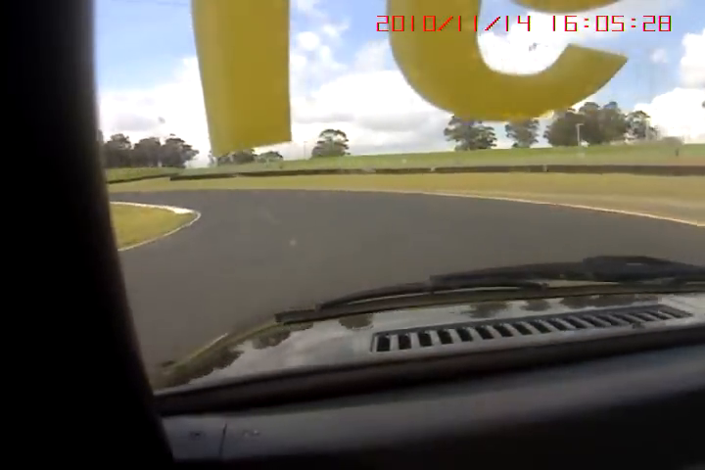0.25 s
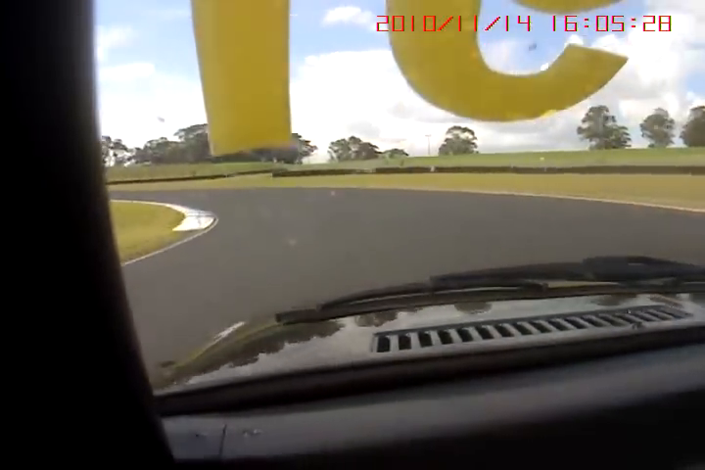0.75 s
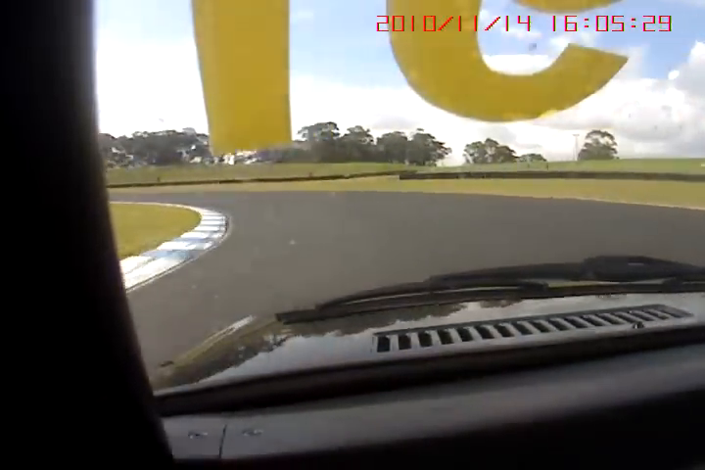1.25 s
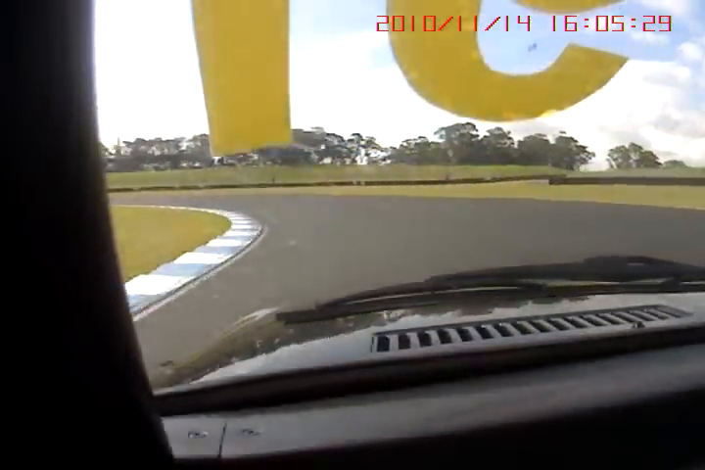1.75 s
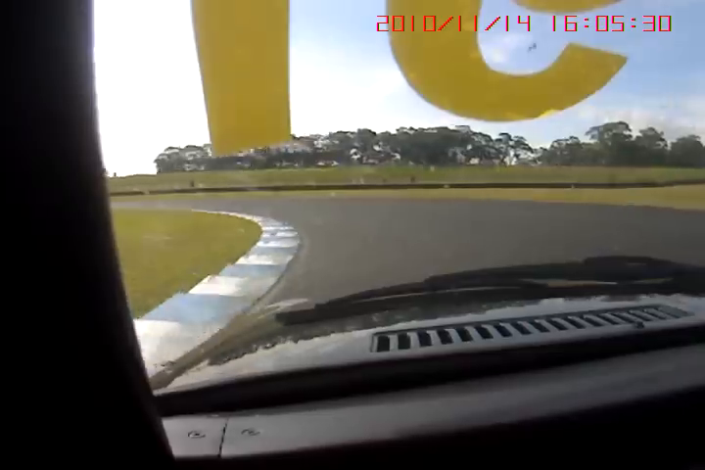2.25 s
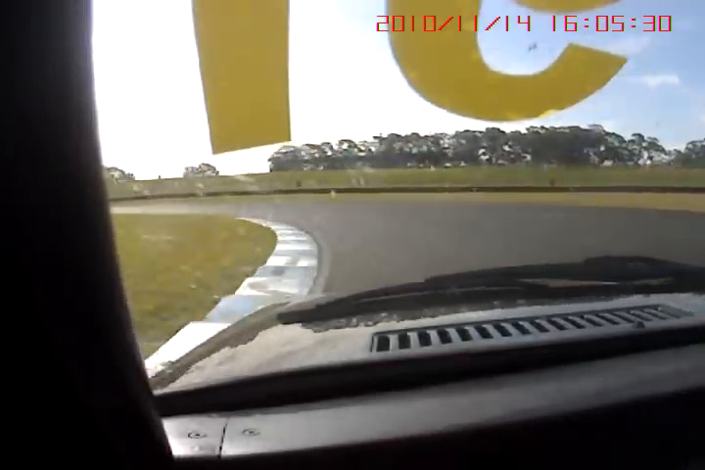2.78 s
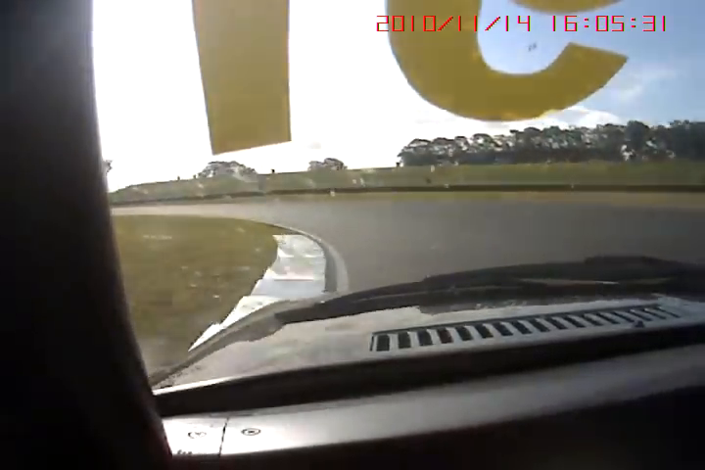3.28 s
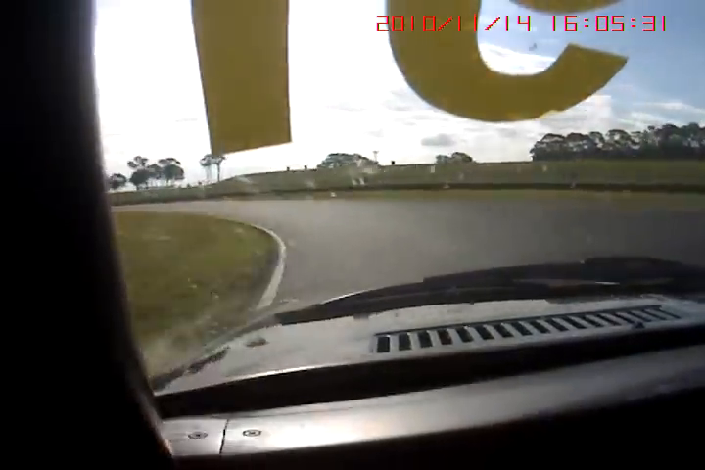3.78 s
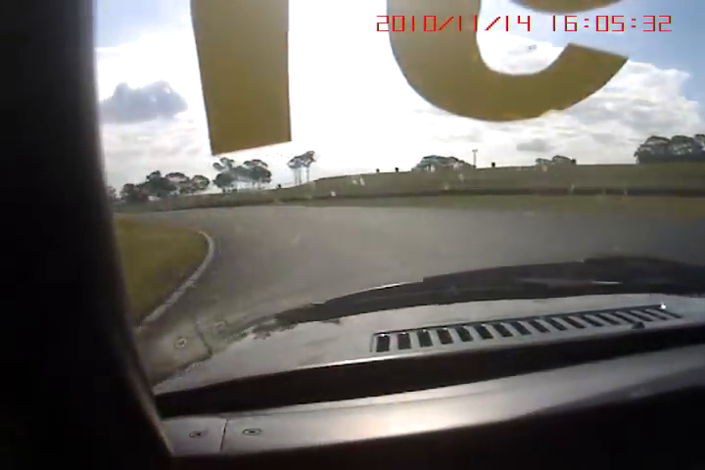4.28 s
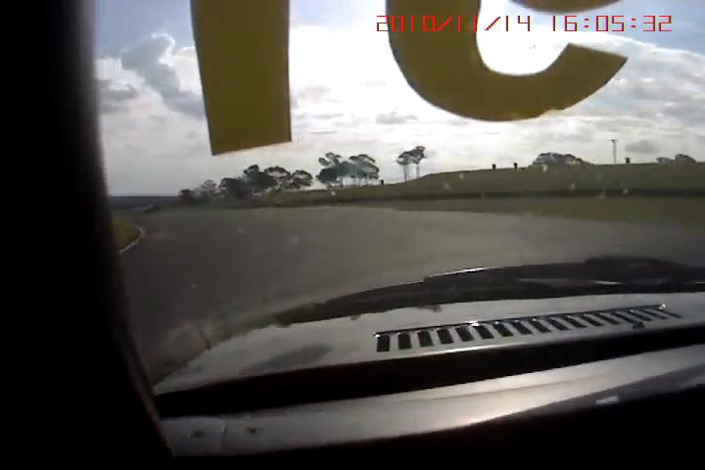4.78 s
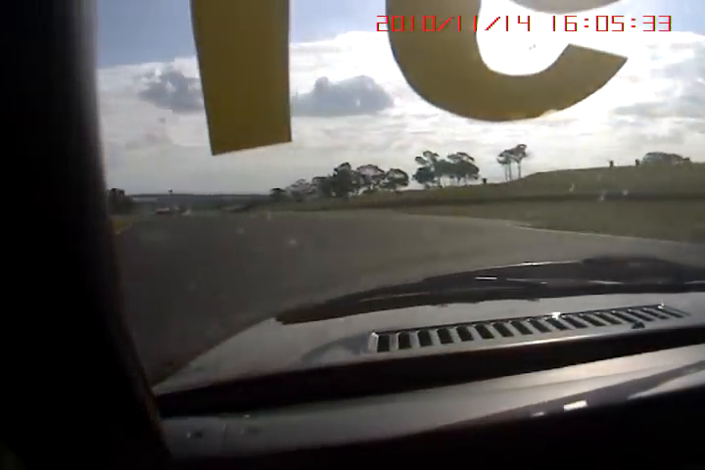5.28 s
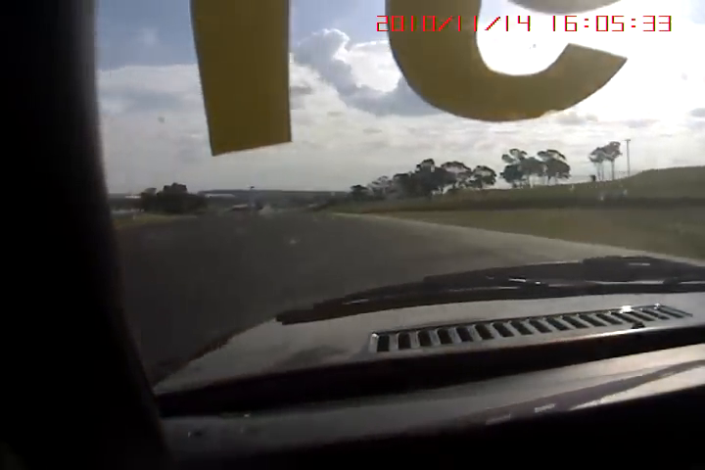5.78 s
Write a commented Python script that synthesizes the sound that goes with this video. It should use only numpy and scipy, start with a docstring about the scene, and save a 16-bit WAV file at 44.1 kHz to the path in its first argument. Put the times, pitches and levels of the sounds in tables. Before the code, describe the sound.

Heard inside a race car cabin through one close, mounted, single-channel microphone. From 0 to 1.5 s a six-cylinder engine drone eases down slightly in pitch, its firing tone near 260 Hz sagging to 230, with overtones swelling and fading in cabin resonances. Low road rumble, panel roar and scattered dry knocks of a loose mount accompany it. Around 1.5 to 3 s the throttle is light: the engine is softer, gear whine and a wavering mid-pitched tyre hum stand out. Around 3 to 3.4 s a few small stones tick underneath; rougher road rumbles until 3.9, with clustered knocks and a hard clack at 4.0. From about 4.2 s the engine pulls strongly, climbing smoothly to about 310 Hz by 6 s, louder and fuller, while buzzing, rattling knocks and slightly stronger air hiss crowd in. It ends still accelerating, without a shift.

```python
"""A six-cylinder engine, heard inside a race car in a bend, eases off and then pulls hard out of the corner.
Its sound is a stack of sine waves tied to the turning crank, swelling where the cabin resonates; gears whine along.
The tyres add a wavering hum, and shaped noise makes the road rumble, the roar of the body and the hiss of air.
A loose mount buzzes and knocks as the shaking throws it about, and a few small stones tick under the car."""
import sys
import numpy as np
from scipy import signal
from scipy.fft import rfft, irfft
from scipy.io import wavfile
from scipy.ndimage import uniform_filter1d

SR = 44100
rng = np.random.default_rng(int(sys.argv[2]) if len(sys.argv) > 2 else 0)


def master_out(mix):
    """Clip the mix to full scale and print it as 16-bit PCM to the path in sys.argv[1]."""
    frames = np.transpose(np.atleast_2d(mix))
    ceiling = np.clip(frames, -1, 1)
    pcm = np.round(ceiling * 32767).astype(np.int16)
    wavfile.write(sys.argv[1], SR, pcm)


N = 266364  # length in samples

# Engine speed and its main tone: time_s, cycle_rate_hz (four-stroke cycles), firing_level_db
ENGINE_SPEED = [(0, 43.22, -41), (.14, 42.2, -28), (.35, 41.36, -24.5), (.65, 40.63, -32.5),
                (.95, 39.62, -31.5), (1.1, 39.19, -17.5), (1.2, 38.83, -28), (1.28, 38.53, -25),
                (1.4, 38.48, -33), (1.53, 38.18, -32), (1.64, 38.36, -19.5), (1.95, 38.36, -33.5),
                (2.4, 38.81, -29), (2.7, 39.29, -22), (3.05, 40.4, -25), (3.5, 41.55, -50),
                (3.75, 42.17, -41), (3.92, 42.68, -26), (4.4, 43.83, -19), (4.8, 45.65, -13),
                (5.0, 46.7, -20.5), (5.15, 47.21, -11.5), (5.45, 48.99, -12.5), (5.8, 50.54, -10),
                (6.04, 51.56, -16.5)]
# How far the throttle is open: time_s, opening (0 shut, about 1 full)
THROTTLE_OPENING = [(0, 0.44), (.5, 0.24), (1, 0.38), (1.6, 0.21), (2.2, 0.04), (2.8, 0.26), (3.4, 0.42),
                    (4, 0.58), (4.6, 0.98), (5.2, 1.01), (6.04, 1.01)]
# How strongly the cabin passes orders 3, 9 and 12: pitch_hz, level_db (before waver and slowing)
CABIN_PASSES = [(114, -30), (120, -32.5), (125, -36), (129, -39), (154, -38), (343, -34), (365, -27),
                (376, -29), (392, -22.5), (425, -33), (440, -25), (455, -22.5), (457, -30.5), (471, -27.5),
                (480, -50), (488, -32.5), (497, -24), (508, -31.5), (518, -50.5), (545, -29.5), (565, -41),
                (590, -28.5), (616, -34.5)]
# How those three orders vary: order (multiple of the cycle), waver_db, change_while_slowing_db
ORDER_WAVER = [(3, 1.5, -0.5), (9, 2.6, -5.5), (12, 2, -12)]
# Weaker orders from uneven cylinders and pipe lengths: order, base_level_db (throttle and cabin change it)
UNEVEN_ORDERS = [(1, -39.5), (2, -50), (4, -38), (5, -41), (7, -32.5), (8, -38), (10, -37.5), (11, -44.5),
                 (13, -46), (14, -41), (15, -50), (16, -48), (17, -52.5), (18, -44.5), (19, -53), (20, -72),
                 (21, -53), (24, -46.5), (25, -46), (30, -47)]
# Resonances of cabin air and panels: pitch_hz, width_hz, lift_db
CABIN_RESONANCES = [(101.4, 9.7, 18), (226, 10, 9.5), (252.4, 18, 14), (297, 22, -1), (307.4, 16, 9.5),
                    (394.4, 19, 10), (497, 20, 11.5), (543, 7.7, 6.5), (670.4, 32, 15), (795, 92, 8),
                    (980, 56, 5), (1210, 11, -0.5)]
# Tones of the gear whine: multiple (of the tooth contact rate), base_level_db
GEAR_TONES = [(.5, -41), (2, -50), (3, -55), (4, -54), (6, -56)]
# Change of the gear whine, clearest on a light steady load: time_s, change_db
GEAR_LEVEL = [(0, -8.5), (1.3, -9), (1.7, -0.5), (2.3, 1.5), (2.7, -3), (3.1, -5.5), (6.04, -7)]
# Tyre hum: time_s, pitch_hz, level_db
TYRE_HUM = [(0, 362.4, -30.5), (.16, 364.3, -33), (.28, 366, -18.5), (.46, 367, -22), (.56, 365, -32),
            (.8, 358, -33.5), (1.05, 346, -31.5), (1.45, 335, -30), (1.8, 336, -23.5), (2.1, 336.6, -28.5),
            (2.5, 340.1, -25.5), (2.85, 342, -26.5), (3.6, 359, -25.5), (3.85, 365, -22), (4.4, 379.6, -31),
            (4.8, 387, -26), (5.2, 386, -26.5), (5.6, 397, -33), (6.04, 411, -32.5)]
# Stretches of coarser road: start_s, end_s, extra_rumble_db
ROUGH_ROAD = [(0, 1.0, 2.5), (3.13, 3.85, 5), (4.7, 5.95, 4.5)]
# Colour of the road rumble: pitch_hz, relative_level_db (per Hz)
RUMBLE_COLOUR = [(15, -13.5), (30, 4), (50, -13.5), (70, -2), (95, -23), (140, -22)]
# Colour of the body roar, before resonances: pitch_hz, relative_level_db (per Hz)
ROAR_COLOUR = [(60, -23.5), (100, -2), (170, -0.5), (230, 3.5), (330, 3.5), (430, 6.5), (560, -7.5),
               (700, -10), (900, -16), (1300, -22), (1600, -24), (2500, -24.5), (3400, -25.5),
               (4800, -33.5)]
# Colour of the air hiss, before resonances and hollows: pitch_hz, relative_level_db (per Hz)
HISS_COLOUR = [(1940, -41), (3300, -6), (4600, -1.5), (5100, 1.5), (5520, -3.5), (6930, -4.5), (7740, -9.5),
               (8970, -10), (14300, -26)]
# Resonances of the mounted housing: pitch_hz, width_hz, lift_db
HOUSING_RESONANCES = [(970, 90, 5), (1190, 60, 6), (1700, 150, 3), (1950, 250, 5), (2810, 100, 3),
                      (3065, 110, 8), (3635, 110, 5), (4585, 120, 7), (5675, 200, 4), (6935, 130, 8),
                      (8500, 300, 5), (9450, 200, 5), (11500, 300, 5)]
# Dips in the hiss and the buzz: pitch_hz, width_hz, change_db
SPECTRUM_HOLLOWS = [(5006, 330, -20.5), (7420, 120, -5), (7900, 240, -8.5), (10150, 190, -4),
                    (11600, 300, -2.5)]
# Levels of mount buzz and air hiss: time_s, buzz_db, hiss_db
BUZZ_AND_HISS = [(0, -32, -48.5), (.13, -40.5, -49), (.19, -38, -49), (.25, -48, -50), (.3, -35, -49.5),
                 (.44, -36.5, -48.5), (.48, -52.5, -50.5), (1.4, -57, -51), (1.9, -46, -51),
                 (3.1, -47.5, -50), (3.6, -46.5, -51), (4, -39.5, -48), (4.12, -47, -49.5),
                 (4.3, -36, -45.5), (4.5, -41.5, -47.5), (4.65, -31.5, -43), (4.8, -27.5, -40.5),
                 (4.9, -31, -46), (5.12, -29, -43.5), (5.22, -32, -45.5), (5.42, -30, -43.5),
                 (5.6, -39, -46.5), (5.82, -27, -43.5), (6.04, -27, -42.5)]
# Colour of one mount knock, before resonances and hollows: pitch_hz, relative_level_db
KNOCK_COLOUR = [(500, -34.5), (800, 4), (1400, -7), (2000, -4), (2500, -10), (3200, -7), (3450, -20),
                (4800, -22.5), (7000, -23.5), (10000, -29.5), (12000, -35), (14400, -52)]
# Hard single knocks of the mount: time_s, peak_db
HARD_KNOCKS = [(0.1077, -41), (0.1615, -30), (0.182, -23), (0.29, -28), (0.3287, -27), (0.421, -22),
               (0.54, -27), (0.62, -29), (0.8592, -24), (1.051, -25), (1.072, -25), (1.15, -28),
               (1.29, -35), (1.3349, -31), (1.7057, -27), (1.8626, -25.5), (3.21, -30), (3.5284, -23),
               (3.55, -25), (3.6199, -28), (3.65, -25.5), (3.717, -21), (3.8511, -29), (3.987, -16),
               (4.2238, -24), (4.277, -28), (4.316, -24), (4.427, -43), (4.7015, -25), (4.7227, -36),
               (4.7666, -21), (4.873, -29), (4.9433, -20), (5.002, -19), (5.1513, -17.5), (5.3526, -25),
               (5.693, -24), (5.7393, -36), (5.757, -29), (5.8935, -22)]
# Small stones under the car: time_s, base_level_db (lowered later), pitch_hz
STONE_TICKS = [(2.955, -39, 6963), (3.0365, -42, 12000), (3.2527, -32, 6243), (3.3576, -31, 6197),
               (3.397, -41, 6063)]

CYLINDERS = 6  # firings in one engine cycle
TOOTH_CONTACTS = 26 / 3  # gear contacts in one engine cycle
RUMBLE_DB, RUMBLE_LUMPS_DB = -33.5, 2  # level on smooth road, and how far it wanders
SHUT_THROTTLE_ROAR_DB = -28
CHATTER_DB, CHATTER_S = -19.5, 0.046  # level relative to the knock, and length of the swell around it
KICK_S = 4.7666  # a moment at which the hardest cylinder kicks
TREBLE_EDGE_HZ = 14480


def gain_of(db):
    """Turn decibels into a plain multiplier."""
    return 10 ** (np.asarray(db) / 20)


def evened(x):
    """Scale a sound to an rms (average strength) of 1."""
    return x / np.sqrt(np.mean(x ** 2) + 1e-20)


def curves(rows):
    """Join the rows of a table with straight lines and return each column, sample by sample."""
    times_s, *columns = np.transpose(rows)
    return [np.interp(np.arange(N) / SR, times_s, column) for column in columns]


def read(points, hz):
    """Look up a level by pitch, joining the points on a logarithmic pitch scale."""
    pitches_hz, values = np.transpose(points)
    return np.interp(np.log(hz + 1), np.log(pitches_hz + 1), values)


def lift(modes, hz):
    """Add up the dB from bell-shaped resonances or hollows."""
    return sum(db / (1 + (2 * (hz - centre) / width) ** 2) for centre, width, db in modes)


def drift(rate_hz):
    """Make slow random wandering of rms 1 by keeping only the low frequencies of noise."""
    spectrum = rfft(rng.standard_normal(N))
    smoothing = 1 + (np.fft.rfftfreq(N, 1 / SR) / rate_hz) ** 4
    return evened(irfft(spectrum / smoothing, N))


def noise(colour_db, size, patchy_db):
    """Make noise of a given colour from short random spectra, stronger and weaker in drifting patches."""
    frames, hz = 4 * N // size + 5, np.fft.rfftfreq(size, 1 / SR)
    real, imaginary, patches = rng.standard_normal((frames, len(hz), 3)).T
    patches = uniform_filter1d(patches, size=8, axis=0)  # blur across pitch
    patches = evened(uniform_filter1d(patches, size=6, axis=1))  # blur across time
    level_db = colour_db(hz)[:, None] + patchy_db * patches
    spectra = (real + 1j * imaginary) * gain_of(level_db)
    return evened(signal.istft(spectra, nperseg=size, noverlap=3 * size // 4)[1][:N])


def tone(turns, db):
    """Make a sine wave of the given rms level, starting at a random point of its swing."""
    return np.sqrt(2) * gain_of(db) * np.cos(2 * np.pi * (turns + rng.random()))


def engine():
    """Engine and gears sound at multiples of the cycle rate: firing, stronger and weaker orders, tooth contacts."""
    cycle_hz, firing_db = curves(ENGINE_SPEED)
    throttle = curves(THROTTLE_OPENING)[0]
    turns = np.cumsum(cycle_hz) / SR + 0.0041 * drift(27)  # the crank surges a little
    out = tone(CYLINDERS * turns, firing_db + 1.1 * drift(16))

    slowing = uniform_filter1d(1. * (np.gradient(cycle_hz) < 0), size=12000)  # 1 while the engine slows
    for order, waver_db, slowing_db in ORDER_WAVER:
        passed_db = read(CABIN_PASSES, order * cycle_hz)
        out += tone(order * turns, passed_db + slowing_db * slowing + waver_db * drift(9))

    for order, base_db in UNEVEN_ORDERS:
        throttle_db = 8 * throttle - 10.0
        cabin_db = lift(CABIN_RESONANCES, order * cycle_hz)
        out += tone(order * turns, base_db + throttle_db + cabin_db + 2.7 * drift(6.6))

    gear_db = curves(GEAR_LEVEL)[0]
    for multiple, base_db in GEAR_TONES:
        out += tone(multiple * TOOTH_CONTACTS * turns, base_db + gear_db + 2 * drift(7.6))
    return out


def tyres():
    """Tread blocks hum at road speed, wavering as the tyres scrub through the bend."""
    hum_hz, level_db = curves(TYRE_HUM)
    turns = np.cumsum(hum_hz) / SR + .05 * drift(15)
    level_db = level_db + 2.2 * drift(11) + 2.1 * drift(23)
    return tone(turns, level_db) + tone(2 * turns, level_db - 24.0)  # with a faint octave above


def body():
    """Three noises: low road rumble, panel roar that follows the throttle, and air hiss past the windows."""
    t = np.arange(N) / SR
    rough_db = sum(db * (t > start) * (t < end) for start, end, db in ROUGH_ROAD)
    rough_db = uniform_filter1d(1. * rough_db, size=4000)  # soften the edges of the patches
    rumble_db = RUMBLE_DB + RUMBLE_LUMPS_DB * drift(5.5) + rough_db
    roar_db = SHUT_THROTTLE_ROAR_DB + 5.9 * curves(THROTTLE_OPENING)[0] + 0.53 * drift(33)
    hiss_db = curves(BUZZ_AND_HISS)[1] + 0.41 * drift(14)

    # Each colour drops by 60 dB outside its own range of pitch.
    def rumble_colour(hz):
        return read(RUMBLE_COLOUR, hz) - 60 * (hz > 200)

    def roar_colour(hz):
        resonances_db = .5 * lift(CABIN_RESONANCES + HOUSING_RESONANCES, hz)
        return read(ROAR_COLOUR, hz) + resonances_db - 60 * (hz > 4900)

    def hiss_colour(hz):
        return read(HISS_COLOUR, hz) + lift(SPECTRUM_HOLLOWS + HOUSING_RESONANCES, hz) - 60 * (hz < 3300)

    rumble = gain_of(rumble_db) * noise(rumble_colour, size=4096, patchy_db=-0.5)
    roar = gain_of(roar_db) * noise(roar_colour, size=2048, patchy_db=2.0)
    hiss = gain_of(hiss_db) * noise(hiss_colour, size=512, patchy_db=1.4)
    return rumble + roar + hiss


def mount(shaking):
    """Deep downward swings of the shaking knock a loose mount and ring its housing; hard jolts add chatter."""
    swing = shaking / np.sqrt(uniform_filter1d(shaking ** 2, size=2500) + 1e-12)
    turns = np.cumsum(curves(ENGINE_SPEED)[0]) / SR
    cycle = np.cos(2 * np.pi * (turns - turns[round(KICK_S * SR)]))  # one cylinder kicks hardest
    depth = np.maximum(-swing - .35, 0) * gain_of(4 * cycle)
    trough = (np.roll(swing, 1) > swing) & (np.roll(swing, -1) >= swing)  # lowest point of each swing

    chance = rng.standard_normal((N, 2))
    knocks = 3.2 * trough * depth * gain_of(1.5 * chance[:, 0])
    knocks += (.8 * depth + .1) * chance[:, 1]  # rattling noise between the knocks

    hz = abs(np.fft.fftfreq(4096, 1 / SR))
    colour_db = read(KNOCK_COLOUR, hz) + lift(HOUSING_RESONANCES + SPECTRUM_HOLLOWS, hz)
    log_gain = np.log(gain_of(colour_db))
    # This choice of phase makes the ring start at the knock, with nothing before it.
    ring = np.fft.ifft(np.exp(np.conj(signal.hilbert(log_gain)))).real[:2048]

    buzz = signal.oaconvolve(knocks, ring)[:N]
    power = uniform_filter1d(uniform_filter1d(buzz ** 2, size=1800), size=1800)
    buzz /= np.sqrt(power + 1e-12)  # even out the strength before setting the level

    jolts = np.zeros(N)
    times_s, peak_db = np.transpose(HARD_KNOCKS)
    jolts[np.round(times_s * SR).astype(int)] = gain_of(peak_db)
    swell = np.hanning(round(CHATTER_S * SR))
    chatter = gain_of(CHATTER_DB) * signal.oaconvolve(jolts, swell, "same")
    buzz_gain = gain_of(curves(BUZZ_AND_HISS)[0] + 1.84 * drift(15.5)) + chatter
    hard_knocks = signal.oaconvolve(jolts, ring)[:N] / abs(ring).max()
    return buzz_gain * buzz + hard_knocks


def grit():
    """Small stones tick under the car: short puffs of noise in a narrow band, dying away quickly."""
    out, t = np.zeros(N), np.arange(600) / SR
    puffs = rng.standard_normal((len(STONE_TICKS), len(t)))
    for (start_s, level_db, pitch_hz), puff in zip(STONE_TICKS, puffs):
        edges_hz = [pitch_hz * 0.95, pitch_hz * 1.07]
        band = signal.butter(2, edges_hz, "bandpass", fs=SR, output="sos")
        fade = gain_of(level_db - 5.5 - 60 * t / 0.026)  # falls 60 dB in 26 ms
        attack = 1 - np.exp(-t / .001)
        out[round(start_s * SR):][:len(t)] += fade * attack * evened(signal.sosfilt(band, puff))
    return out


def scene():
    """Add all sources into one channel; engine and tyres together shake the mount."""
    shaking = engine() + tyres()
    return (shaking + body() + mount(shaking) + grit())[None]


def record(dry):
    """Round off the highest peaks, add a small constant offset and cut the treble above the edge."""
    rounded = 1.1 * np.tanh(dry / 1.1) + .0077
    treble_cut = signal.firwin(1023, TREBLE_EDGE_HZ, window=("kaiser", 9), fs=SR)
    return signal.oaconvolve(rounded, treble_cut[None], "same")


dry = scene()
out = record(dry)
master_out(out)
```